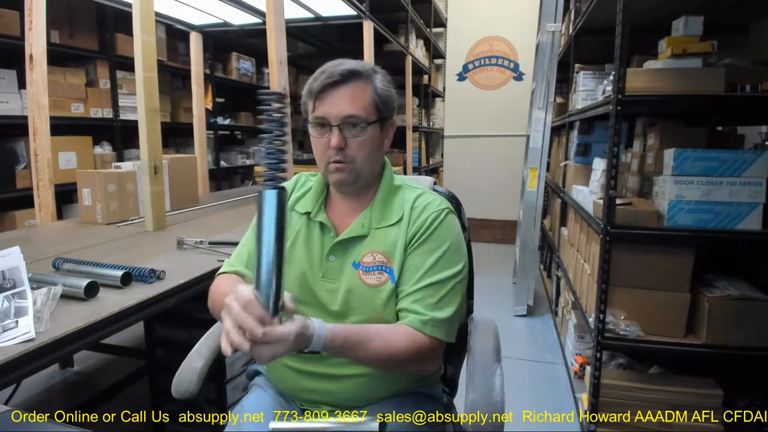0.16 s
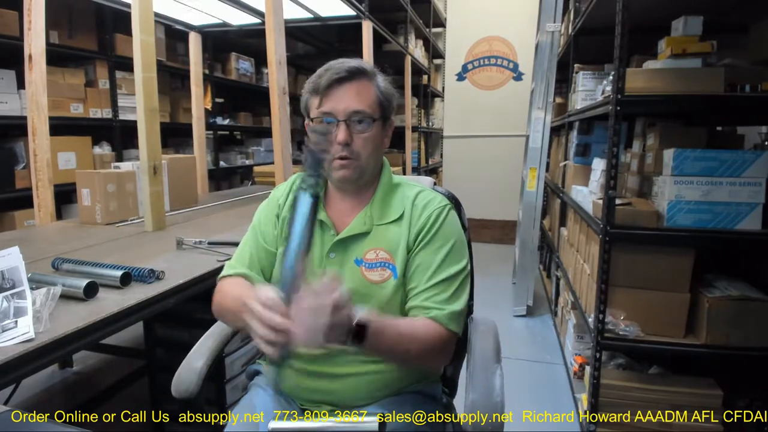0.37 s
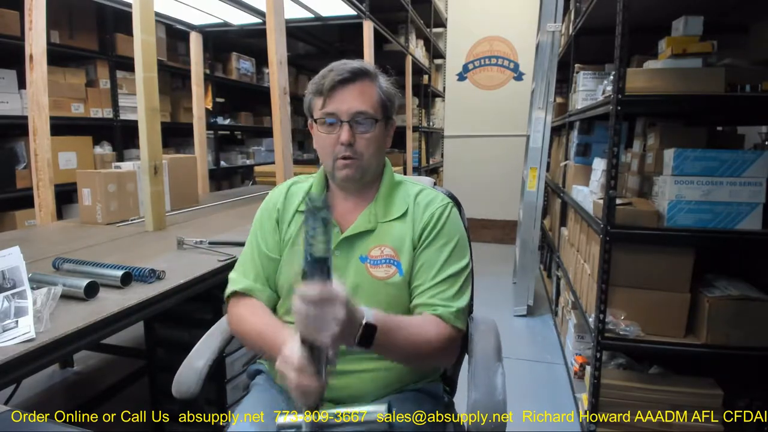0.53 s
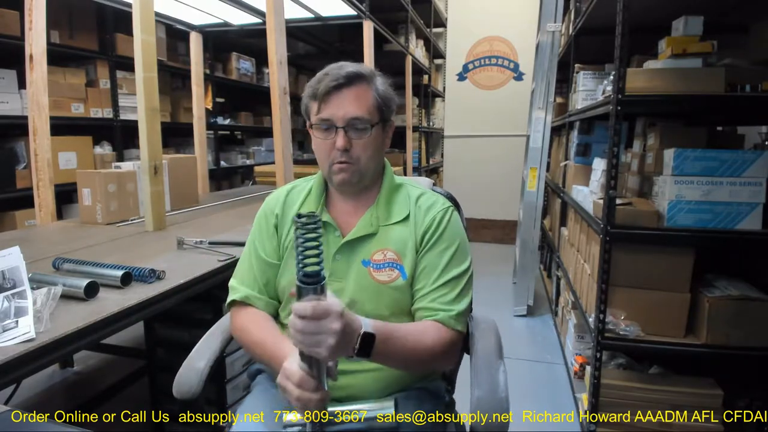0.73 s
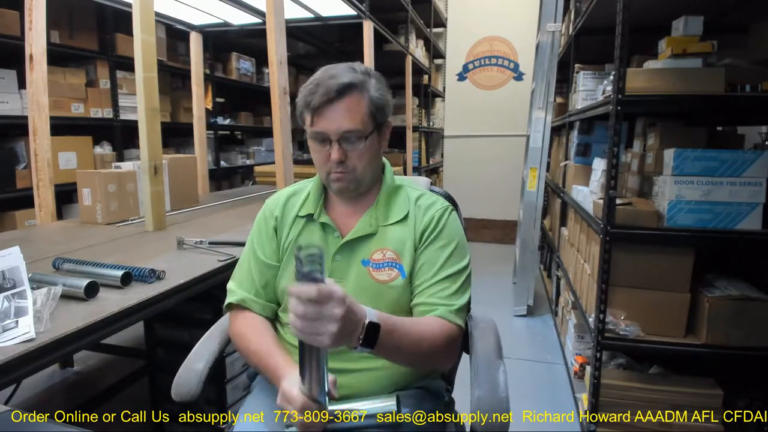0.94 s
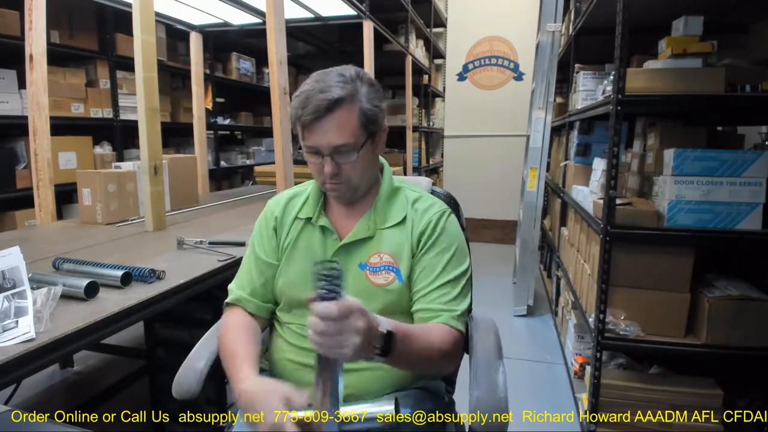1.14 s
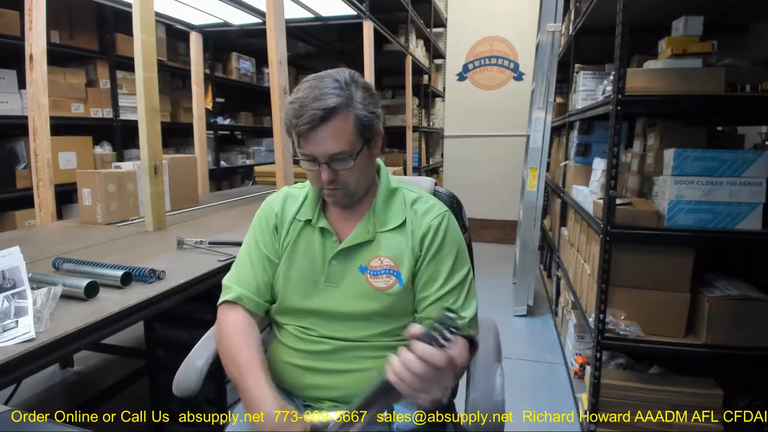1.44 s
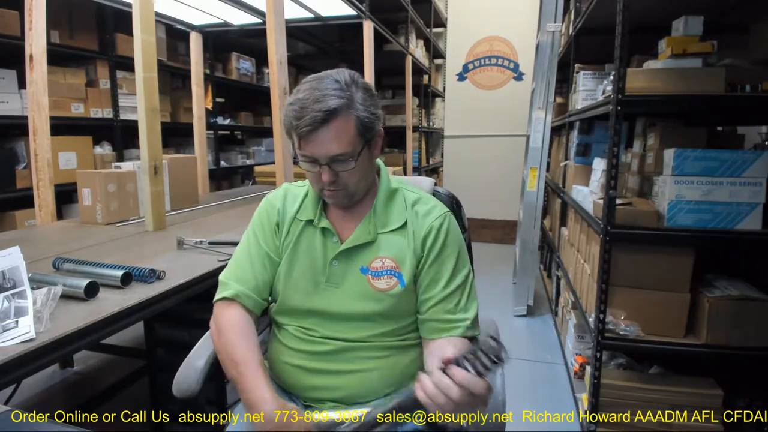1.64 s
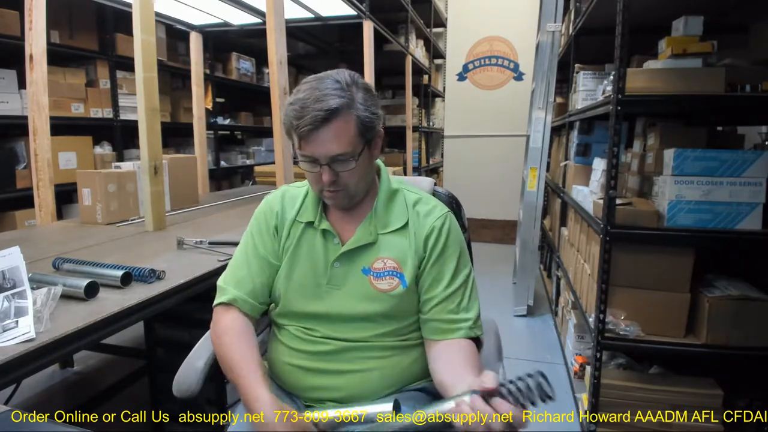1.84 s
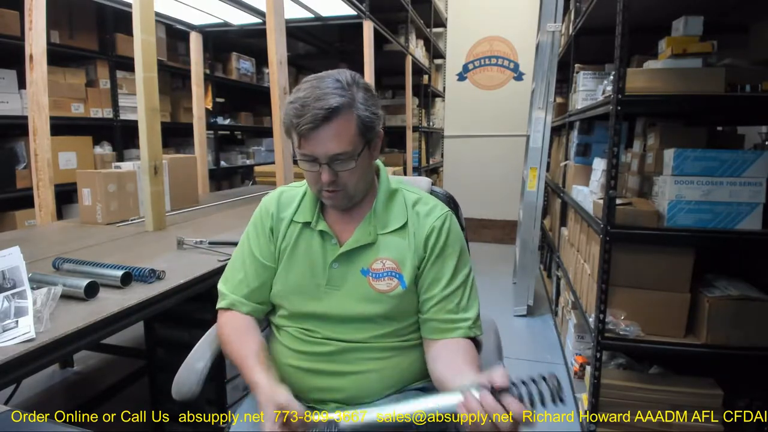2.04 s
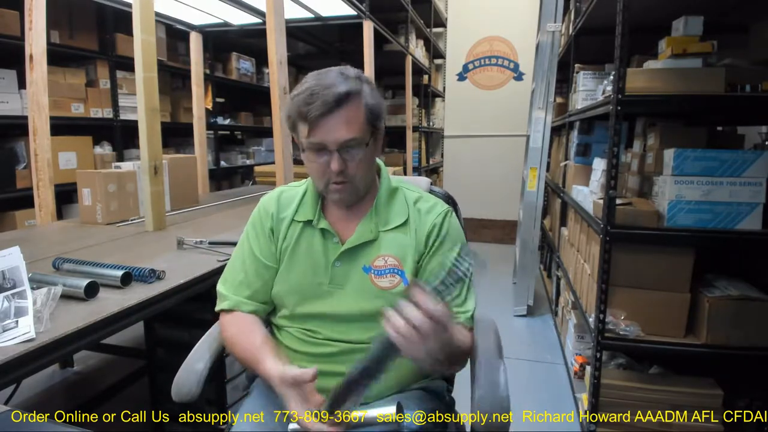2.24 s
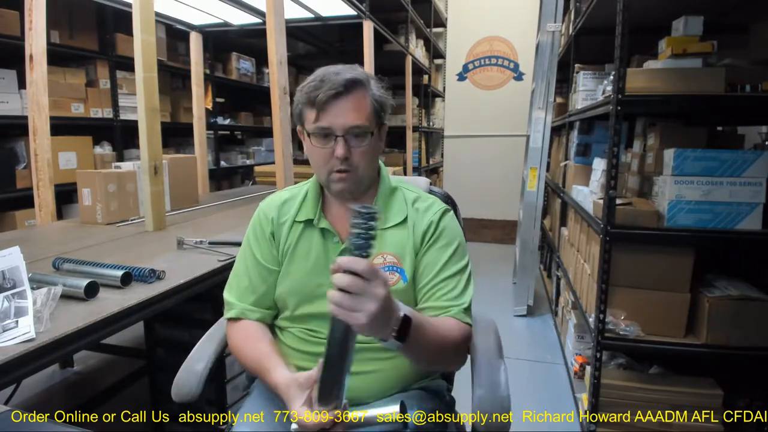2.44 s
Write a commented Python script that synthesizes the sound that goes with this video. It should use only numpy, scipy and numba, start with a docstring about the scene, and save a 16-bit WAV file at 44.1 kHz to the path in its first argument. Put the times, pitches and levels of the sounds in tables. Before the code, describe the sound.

A steel coil spring rattles and scrapes against a thin metal tube, close to the microphone. After a faint tick, a hard, bright clatter bursts from 0.2 to 0.6 seconds, then lighter ringing knocks until 1.05. Near quiet follows, with faint clinks at 1.5 and a run of small ticks from 1.65, growing into scraping and sharper knocks around 1.9 to 2.4. Slight room echo, low hum and soft air remain.

```python
"""In a warehouse, close to a desk microphone, a hand turns over a thin metal tube with a steel coil spring inside.
The spring rattles and scrapes: dense tiny knocks and single blows ring the tube and the coils as tuned modes.
Knocks and bright cracks also ring the wire, made as decaying coloured noise.
A short echo, a mains hum (a sine) and air (shaped noise) lie behind."""
import sys
import numpy as np
from scipy import signal
from scipy.fft import rfft, irfft, next_fast_len
from scipy.io import wavfile
from scipy.ndimage import uniform_filter1d
from numba import njit

SR = 44100
rng = np.random.default_rng(int(sys.argv[2]) if len(sys.argv) > 2 else 0)


def to_wav(s):
    """Save 16-bit WAV."""
    ch = np.atleast_2d(s).T  # columns
    pcm = np.round(np.clip(ch, -1, 1) * 32767)  # PCM
    wavfile.write(sys.argv[1], SR, pcm.astype(np.int16))


def natural_amplitude(level_db):
    """Convert a level in decibels to a linear amplitude factor, elementwise."""
    exponent = np.asarray(level_db, float) / 20
    return 10 ** exponent


N = 114660  # length in samples

# How hard the spring scrapes over time: time_s, level_db
SCRAPE = [(0, -54), (.12, -66), (.2, -37.5), (.23, -27), (.28, -20.5), (.335, -16.5), (.35, -30.5),
          (.412, -19.5), (.415, -13), (.5, -17), (.55, -25.5), (.59, -20), (.64, -31.5), (.72, -47),
          (.77, -43.5), (.82, -39), (.84, -34.5), (.855, -38), (.88, -25.5), (.928, -36), (.94, -41),
          (.96, -45), (1.12, -53.5), (1.18, -69.5), (1.5, -70), (1.54, -51.5), (1.6, -63), (1.8, -51.5),
          (1.86, -35.5), (2.01, -33), (2.065, -27), (2.12, -30), (2.28, -27.5), (2.36, -27.5),
          (2.42, -42.5), (2.6, -49)]
# Single blows of spring on tube: start_s, strength_db, ring_db (added for the ring only), favoured_hz
BLOWS = [(0.127, -25.5, 14, 5570), (0.207, -46, 17, 5730), (0.224, -29, 17, 4390),
         (0.2838, -0.5, -13, 4515), (0.415, 3, -20, 7530), (0.476, -16, 24, 2500), (0.53, -37, 17, 3741),
         (0.579, -28.5, 22, 3741), (0.7767, -21.5, 8.5, 7220), (0.827, -13.5, -3, 6500),
         (0.8982, -11.5, 11.5, 4540), (1.046, -25.5, -1.5, 7870), (1.5234, -29, 8, 4288),
         (1.6512, -34, 10.5, 6520), (1.705, -21, 12, 6550), (1.7589, -21, 12.5, 5170),
         (1.8127, -22.5, 11, 4270), (1.8532, -19, -5, 6440), (1.8921, -12, 0, 1996),
         (1.9444, -16, 11, 6000), (2.134, -7.5, -16, 5000), (2.161, -9, 3, 8500), (2.233, -40, 8, 2010),
         (2.362, -22.5, 5, 2700), (2.4672, -24.5, -0.5, 6300)]
# How the hand holds the tube: time_s, tube_over_coils_db (share of the scraping),
# grip_loss_db_per_ms (used from 0 to 3), brightness_db (treble over bass)
HOLD = [(0, -6.5, 1.4, -23), (.34, -29.5, 2.1, 3.5), (.42, 9, 1.5, 10), (.55, 6.5, -0.24, 8),
        (.75, -9.5, 0.28, -4), (1, 6.5, 0.17, -8.5), (1.8, -11.5, 0.01, -14), (2.1, -16.5, 1.55, 13),
        (2.6, -14.5, 0.85, -1)]
# Tone of the wire's countless close modes: pitch_hz, level_db
WIRE = [(150, -81.5), (250, -34), (444, -6.5), (700, -16.5), (1330, -12), (2570, -8), (3980, -11),
        (4650, -8), (7700, -10), (10000, -17), (11300, -13.5), (16000, -26.5)]
# Modes of the tube: pitch_hz in one list, level_db in the other
TUBE_HZ = [1260, 1640, 2040, 2570, 3547, 3741, 4288, 4515, 5765, 6840, 6961, 7505, 7556, 8211, 8592, 11510]
TUBE_MODE_DB = [-14, -16, -15.5, -13, -12.5, -10.5, -9, -11, -21, -8.5, -7, -11, -10.5, -8, -18.5, -14]
# Modes of the coils: pitch_hz in one list, level_db in the other
COILS_HZ = [2010, 2700, 4470, 4790, 5710, 5930, 6220, 7720, 8260, 10870]
COILS_MODE_DB = [-8.5, -10.5, -6, -4, -5.5, -7.5, -6.5, -5, -2.5, -13]
# Tone of the air noise: pitch_hz, level_db
AIR = [(15, 9), (30, 1.5), (60, -0.5), (200, -8.5), (450, -9.5), (700, -17), (2500, -28), (7500, -26),
       (10000, -31.5), (16000, -38)]
# Balance between the ears: pitch_hz, left_minus_right_db
LEAN = [(200, 1.3), (700, .9), (1300, .1), (4400, .7)]

# T60 is the time in seconds to fade by 60 dB, before any grip loss
WIRE_T60_S, TUBE_T60_S, COILS_T60_S = 0.074, 0.17, 0.049
WIRE_DB, TUBE_DB, COILS_DB = -4, -5, -6.5
KNOCKS_PER_S, KNOCK_SPREAD_DB = 2500, 2
SPLIT_HZ = 4900  # brightness tips the scraping around here
RATTLE_PER_S, RATTLE_DB = 63, 1
CONTACT_PER_S, CONTACT_DB = 15, 6  # the touching spot wanders, favouring other modes
BLOW_DB, BLOW_S = -7.5, 0.0033  # crack level, and time for it to fade to 37 percent
CRACK_FROM = 0.69  # a crack starts at this share of the favoured pitch
REBOUND_S, REBOUND_DB = 0.0033, 0.5  # the coil lands again just after each blow
RING_DB, FALL_DB_PER_OCTAVE, NEAR_DB = 11, 6.5, 10  # a blow's ring; weaker away from the favoured pitch
SPOT_DB = 6.5  # scraping keeps favouring the pitch of the last blow
ROOM_T60_S, ROOM_DB = 0.32, -24
AIR_DB = -54.5
HUM_HZ, HUM_DB = 119.8, -56.5
WIDTH_DB = -26
TOP_HZ = 15700


def clatter():
    """Wire, tube and coils are steel parts shaken by the same contacts, so they ring together."""
    force = scraping()
    grip = natural_amplitude(-np.clip(read(HOLD, column=2), 0, 3) * 1000 / SR)  # factor per sample
    lean = natural_amplitude(read(HOLD, column=1) / 2)
    tube = body(force * lean, TUBE_HZ, TUBE_MODE_DB, TUBE_T60_S, grip)
    coils = body(force / lean, COILS_HZ, COILS_MODE_DB, COILS_T60_S, grip)
    steel = natural_amplitude(WIRE_DB) * wire(force + cracks()) + natural_amplitude(TUBE_DB) * tube + natural_amplitude(COILS_DB) * coils
    return signal.sosfilt(signal.butter(2, 260, "high", fs=SR, output="sos"), steel)


def scraping():
    """Spring sliding on tube: a dense random stream of tiny knocks, shaped in strength and brightness."""
    size_db = np.minimum(KNOCK_SPREAD_DB * rng.exponential(size=N), 14)
    happens = rng.random(N) < KNOCKS_PER_S / SR
    knocks = unit(happens * natural_amplitude(size_db) * rng.standard_normal(N))
    dull = signal.sosfilt(signal.butter(1, SPLIT_HZ, fs=SR, output="sos"), knocks)
    tilt = natural_amplitude(read(HOLD, column=3) / 2)
    force = dull / tilt + (knocks - dull) * tilt
    return force * natural_amplitude(read(SCRAPE, column=1) + RATTLE_DB * walk(RATTLE_PER_S))


def cracks():
    """The hard contact of each blow: a fading burst of bright noise, with a rebound."""
    fade = np.exp(-np.arange(SR // 25) / SR / BLOW_S)
    fade = fade + natural_amplitude(REBOUND_DB) * np.roll(fade, int(REBOUND_S * SR))
    out = np.zeros(N)
    for start_s, strength_db, _, favoured_hz in BLOWS:
        chatter = rng.standard_normal(len(fade))
        highpass = signal.butter(3, CRACK_FROM * favoured_hz, "high", fs=SR, output="sos")
        bright = signal.sosfilt(highpass, chatter)
        start = int(start_s * SR)
        out[start:start + len(fade)] += bright * fade * natural_amplitude(strength_db + BLOW_DB)
    return out


def wire(force):
    """Close wire modes blur into decaying noise; five answers trade places as the touching spot turns."""
    spots = natural_amplitude(CONTACT_DB * np.array([walk(CONTACT_PER_S) for _ in range(5)]))
    spots = spots / np.sqrt(np.sum(spots ** 2, axis=0))  # total power stays steady
    return sum(signal.fftconvolve(force * share, tail(WIRE_T60_S, WIRE))[:N] for share in spots)


def body(scrape, modes_hz, modes_db, t60, grip):
    """Modes of one steel part, struck and scraped most near each blow's favoured pitch."""
    start_s, strength_db, ring_db, favoured_hz = np.array(BLOWS).T
    starts = (start_s * SR).astype(int)
    # number of the last blow at each moment (the first one until then)
    last = np.maximum(np.searchsorted(start_s, np.arange(N) / SR) - 1, 0)
    out = 0
    for hz, db in zip(modes_hz, modes_db):
        octaves = np.abs(np.log2(hz / favoured_hz))
        near = np.exp(-(octaves * 20) ** 2)  # 1 at the favoured pitch, soon 0 away from it
        wander_db = np.clip(CONTACT_DB * walk(CONTACT_PER_S), -9, 5)
        force = scrape * natural_amplitude(wander_db + SPOT_DB * near[last])
        hit_db = RING_DB + strength_db + ring_db - FALL_DB_PER_OCTAVE * octaves + NEAR_DB * near
        force[starts] += natural_amplitude(hit_db + 2 * rng.standard_normal(len(starts)))
        pole = np.exp((2j * np.pi * hz - np.log(1000) / t60) / SR)
        out = natural_amplitude(db) * ring(force, pole, grip) - out  # neighbours get opposite sign
    return out / 20


@njit
def ring(force, pole, grip):
    """One mode: a turning, shrinking vector pushed by the force and damped further by the hand."""
    y, z = np.empty(len(force)), 0j
    for i in range(len(force)):
        z = z * pole * grip[i] + force[i]
        y[i] = z.imag
    return y


def echo(near):
    """The room answers with many reflections, made as decaying white noise."""
    return natural_amplitude(ROOM_DB) * signal.fftconvolve(near, tail(ROOM_T60_S))[:N]


def hum():
    """Mains hum: one low sine whose level wanders a little."""
    level = natural_amplitude(HUM_DB + 1.3 * walk(5.94))
    return np.sqrt(2) * level * np.sin(2 * np.pi * HUM_HZ * np.arange(N) / SR)


def air():
    """Steady air noise of the warehouse: random noise shaped in tone."""
    return natural_amplitude(AIR_DB) * unit(colour(rng.standard_normal(N), AIR))


def read(rows, column):
    """One column of a table over time, joined by straight lines, per sample."""
    rows = np.array(rows)
    return np.interp(np.arange(N) / SR, rows[:, 0], rows[:, column])


def walk(rate):
    """Wandering values: a new random target, rate times a second, reached in a straight line; spread near 1."""
    k = int(SR / rate)
    held = rng.standard_normal(N // 100)[np.arange(N) // k]
    return 1.33 * uniform_filter1d(held, k)


def tail(t60, table=((20, 0),)):
    """Fading coloured noise with unit energy, half a second long."""
    t = np.arange(SR // 2) / SR
    h = colour(rng.standard_normal(len(t)), table) * natural_amplitude(-60 * t / t60)
    return h / np.sqrt(np.sum(h ** 2))


def colour(x, table):
    """Change the tone by a table of pitch_hz, level_db."""
    size = next_fast_len(len(x))
    hz = np.maximum(np.arange(size // 2 + 1) * SR / size, 1)
    table = np.array(table)
    gain_db = np.interp(np.log(hz), np.log(table[:, 0]), table[:, 1])
    return irfft(rfft(x, size) * natural_amplitude(gain_db), size)[:len(x)]


def unit(x):
    """Scale to an average (rms) level of 1."""
    return x / np.sqrt(np.mean(x ** 2))


def scene():
    """The clatter, its echo, the hum and the air, nearly the same in both ears."""
    near = clatter()
    mid = near + echo(near) + air() + hum()
    side = natural_amplitude(WIDTH_DB) * signal.fftconvolve(mid, tail(.02))[:N]
    lean = np.array(LEAN)
    left = colour(mid + side, lean * [1, 0.5])
    right = colour(mid - side, lean * [1, -0.5])
    return np.array([left, right])


def top_cut(x):
    """A second steep low-pass: nothing passes above about 16.8 kHz."""
    return signal.sosfilt(signal.butter(12, 16830, fs=SR, output="sos"), x)


def record(dry):
    """The microphone chain cuts the top with a steep low-pass filter."""
    lowpass = signal.ellip(8, .2, 70, TOP_HZ, fs=SR, output="sos")
    mix = signal.sosfilt(lowpass, dry)
    return top_cut(mix)


dry = scene()
out = record(dry)
to_wav(out)
```